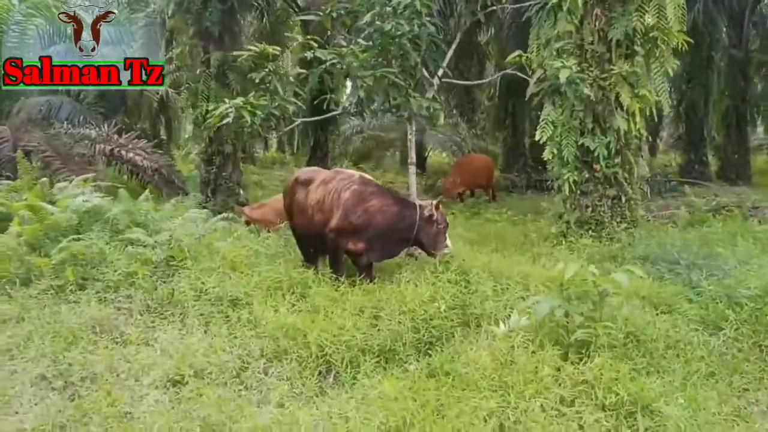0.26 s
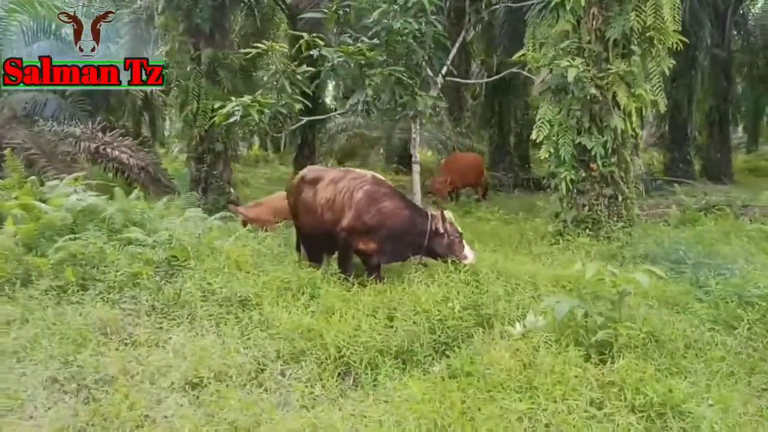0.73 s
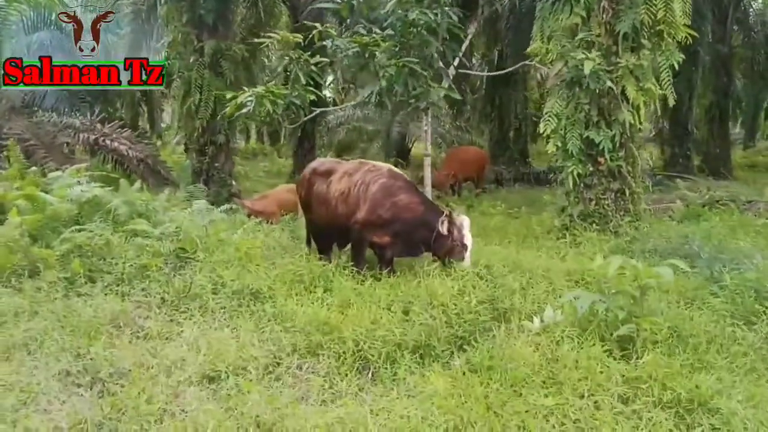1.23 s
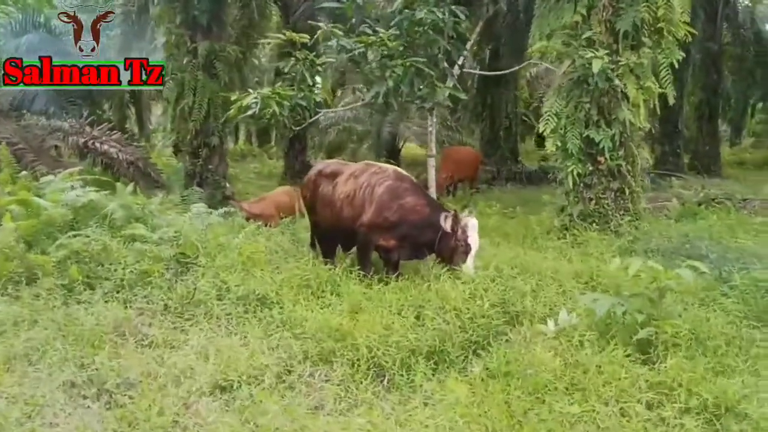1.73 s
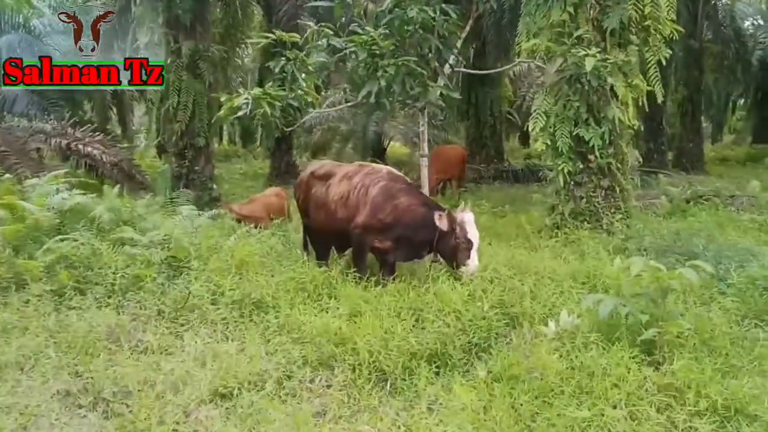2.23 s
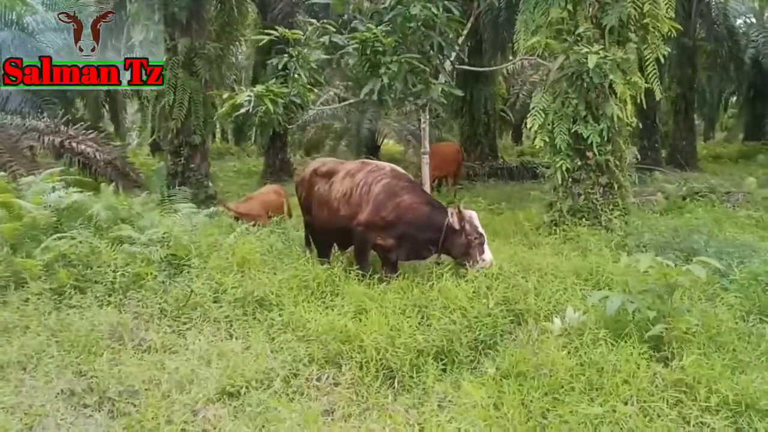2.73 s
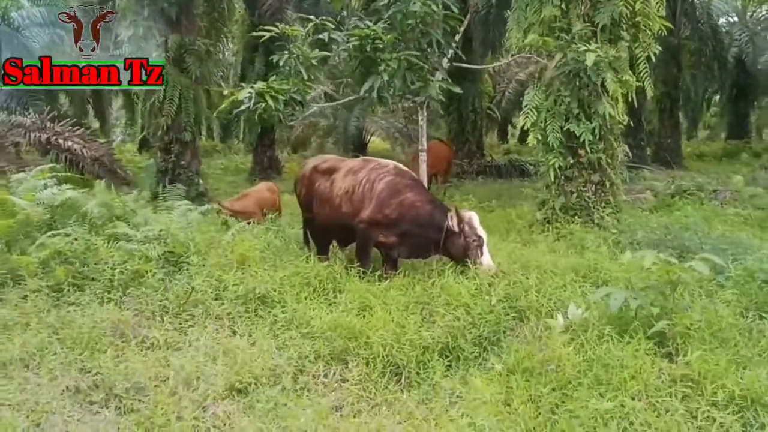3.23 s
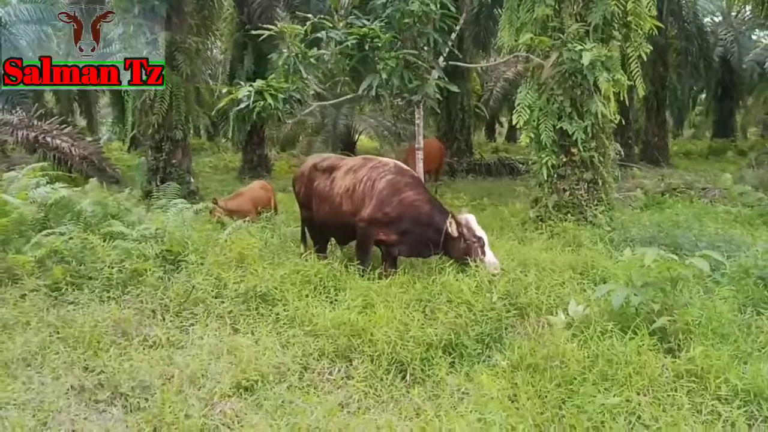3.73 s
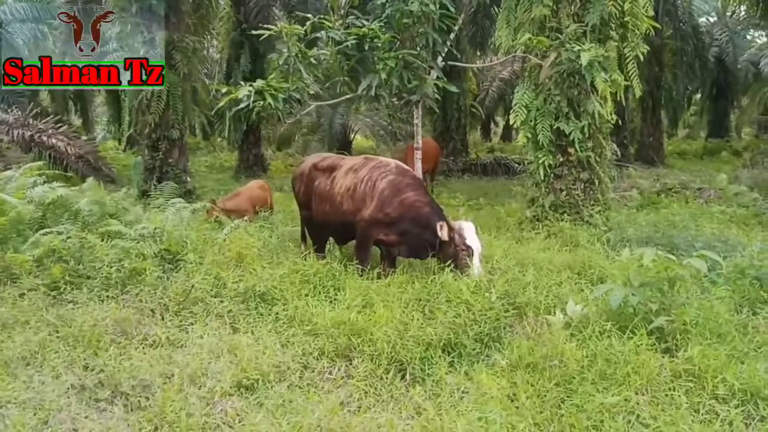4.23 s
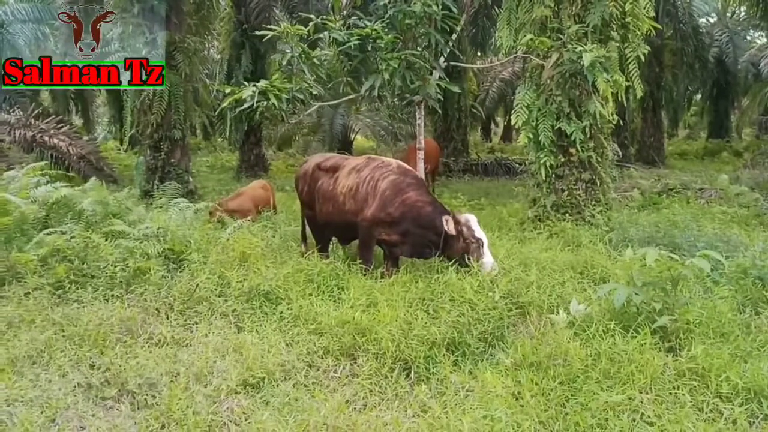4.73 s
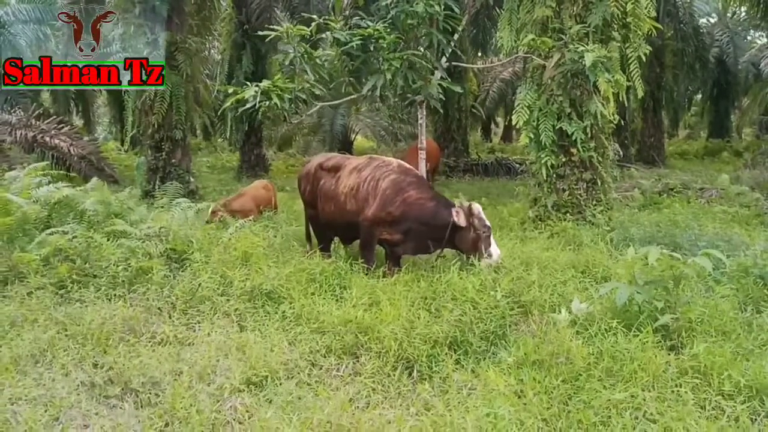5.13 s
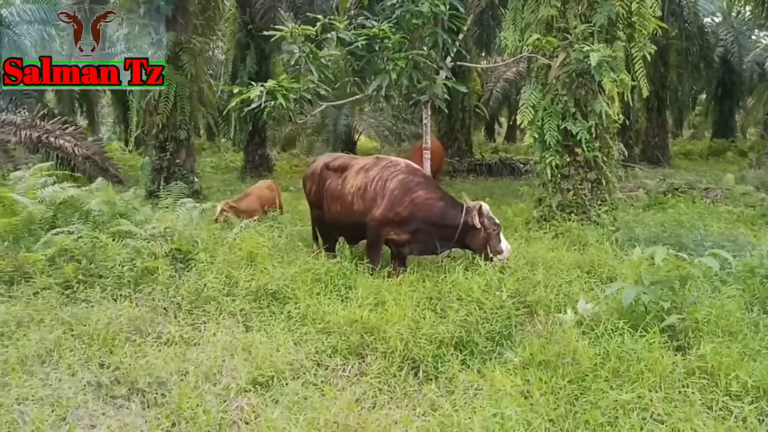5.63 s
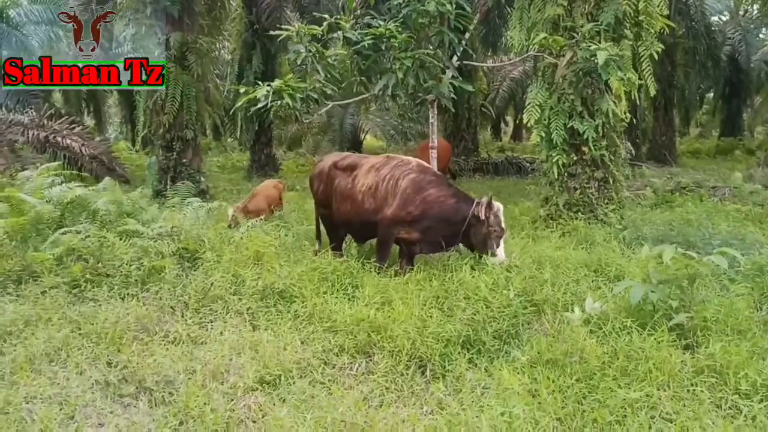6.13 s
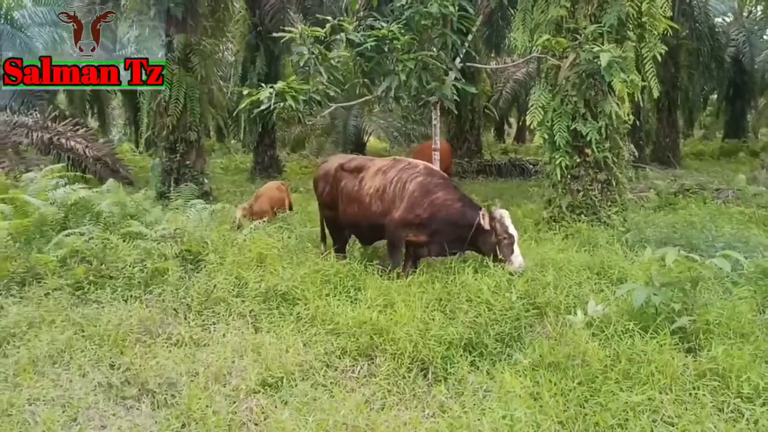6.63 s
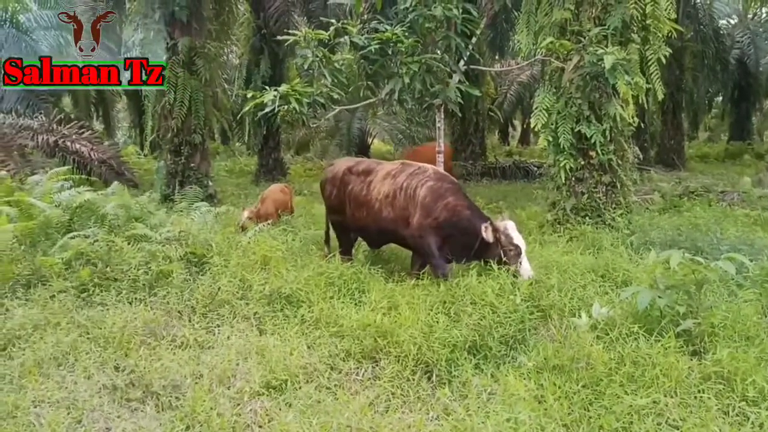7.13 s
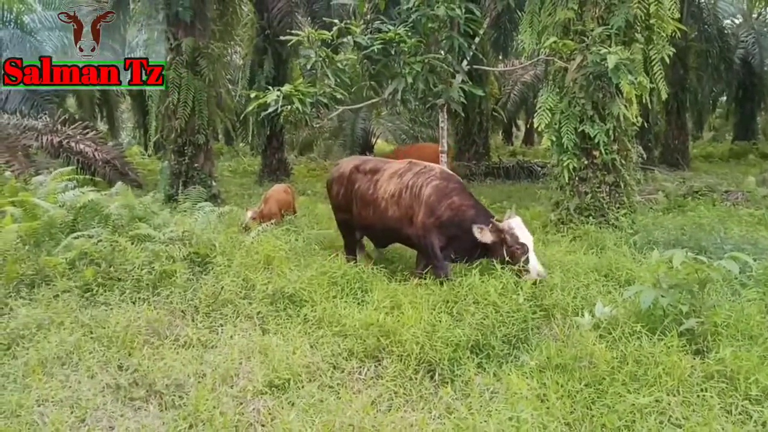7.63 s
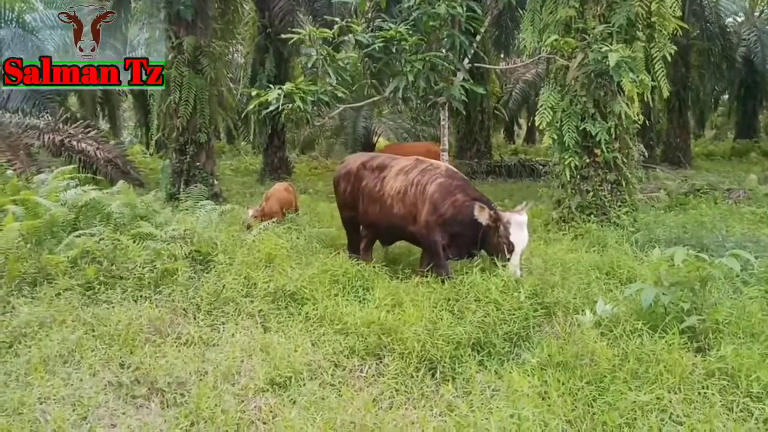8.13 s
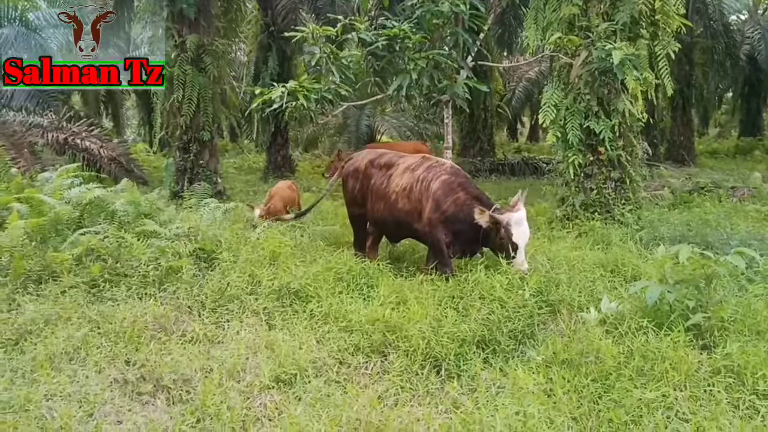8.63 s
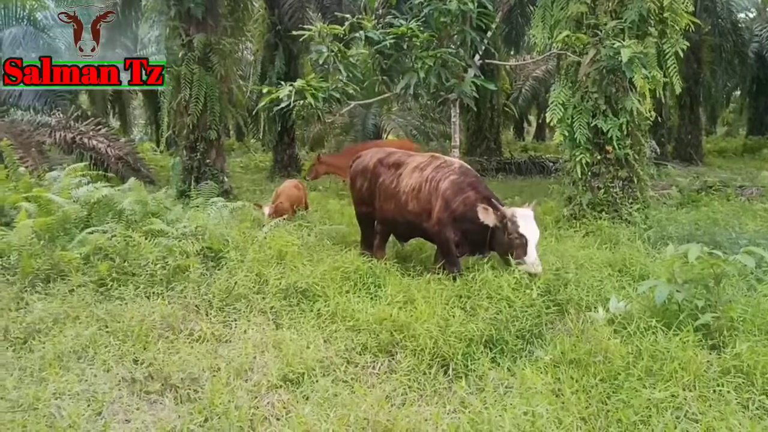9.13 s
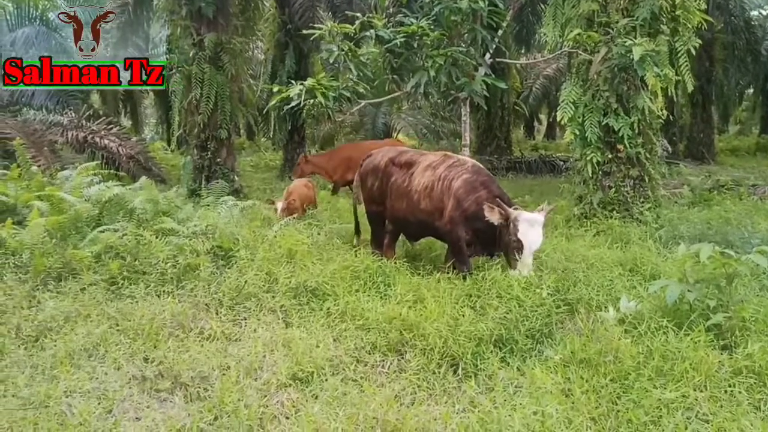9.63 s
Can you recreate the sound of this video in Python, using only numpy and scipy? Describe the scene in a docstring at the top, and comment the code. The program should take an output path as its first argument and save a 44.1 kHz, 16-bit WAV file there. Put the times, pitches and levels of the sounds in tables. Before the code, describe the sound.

Close, mono-like outdoor sound in a damp grove with a brief bright scatter from trunks. From 0 to 0.5 s grass rips strongly, with a crowd of dry stem snaps, wet pops and a tiny upward squeak. Tearing continues to about 2 s with scattered pops and snaps; a fuller pull runs 2.4-2.8 s, ending in a cluster of snaps near 3 s. From 3.5 to 6.7 s the grass is much quieter, with only small swishes. Lighter, airy brushing returns around 7 s and persists, with a sharp bright snap at 8 s. Throughout: soft low rumble, very high rasping katydid, thin whine and far insect chorus. Rapid cricket phrases start at 1.5, 2.9, 4.3, 5, 7.2 and 9 s; a high trill spans 3.2-4.9 s. Faint engine drones waver and glide. A faint hum passes near 7 s; short distant bird clucks fall at 7.3, 8.2 and 9.1 s.

```python
"""Damp palm grove, cattle grazing close to one microphone, over a low rumble and a far insect chorus.
From the start grass swishes and tears, stems snap and wet ground pops; a katydid rasps throughout.
Far engine drones glide in soon after; crickets chirp in pairs from 1.5 s, a high trill joins at 3.2 s.
Late on a faint far hum comes and goes, and a distant bird clucks three times from 7.3 s.
Noise is coloured for grass and air, resonated for stems and chorus; tones make chirps, clucks and drones."""
import sys
import numpy as np
from scipy import signal
from scipy.fft import rfft, irfft, next_fast_len
from scipy.io import wavfile

SR = 44100
rng = np.random.default_rng(int(sys.argv[2]) if len(sys.argv) > 2 else 0)


def elevation(decibels):
    """Turn decibel levels (scalar or array-like) into linear amplitude ratios."""
    levels = np.asarray(decibels, float)
    return 10 ** (levels / 20)


def bounce(signal):
    """Save signal as a 16-bit WAV file at the path given by the first command-line argument."""
    frames = np.transpose(np.atleast_2d(signal))
    limited = np.clip(frames, -1, 1)
    pcm = np.round(limited * 32767).astype(np.int16)
    wavfile.write(sys.argv[1], SR, pcm)


N = 435311

# Rumble, far leaves and microphone hiss, relative spectrum: f/Hz, level/dB per Hz
AIR_COLOUR = [(25, -39), (50, -4), (130, 0.5), (255, -9), (750, -20), (1100, -24.5), (2200, -30.5),
              (4000, -25), (4900, -21.5), (5500, -32), (6400, -33.5), (8200, -16), (10000, -27.5),
              (12300, -39), (15400, -25.5)]
# Hump in the rumble: f/Hz, width/Hz, mean level/dB
RUMBLE_TONES = [(90.4, 17, -66)]
# Close grass torn in full, relative spectrum: f/Hz, level/dB per Hz
TEARING_COLOUR = [(150, -44), (300, -4), (1000, -3.5), (1800, -2.5), (3100, 0), (4100, 6), (5600, 5.5),
                  (7200, 7.5), (9500, -21), (12000, -9.5), (14800, 3.5), (15400, -4.5)]
# Close grass lightly brushed, relative spectrum: f/Hz, level/dB per Hz
BRUSHING_COLOUR = [(150, -55), (300, -8.5), (650, -8), (1000, -34), (2000, -22), (4300, -2.5),
                   (5900, -10.5), (7900, 0), (10000, -6.5), (12100, -14.5), (14700, -3), (15400, -6)]
# Grass stirring all along: t/s, level/dB, share of light brushing/0-1
STIR = [(0.0, -47.5, 0), (0.5, -47.5, 0.26), (0.65, -47, 0.65), (1.25, -46.5, 0.4), (1.7, -48, 0.33),
        (2.05, -51.5, 0.57), (3.0, -50.5, 0.53), (3.3, -51.5, 0.25), (3.45, -57.5, 0.25),
        (3.76, -62.5, 0.67), (4.11, -53.5, 0.8), (4.6, -64.5, 0.4), (5.0, -56.5, 0.5), (5.3, -61, 0.73),
        (6.7, -56, 0.9), (7.3, -52, 0.7), (8.3, -53, 0.83), (8.8, -58, 0.63), (9.1, -53, 0.78),
        (9.87, -54, 0.7)]
# Single pulls and swishes through the grass: t/s, hold/s, top level/dB, share of light brushing/0-1
PULLS = [(0.0, 0.18, -40.5, 0.25), (0.93, 0.022, -44.5, 0.5), (1.08, 0.025, -45, 0.2),
         (1.372, 0.17, -46, 0.16), (2.133, 0.016, -47.5, 0.57), (2.369, 0.42, -39.5, 0.3),
         (3.083, .03, -61, 0.4), (5.02, .02, -49.5, 0.75), (5.855, .03, -54, 1), (6.133, 0.022, -50.5, 0.8),
         (6.858, 0.22, -49.5, 0.77), (7.088, 0.061, -40.5, 0.93), (7.655, 0.27, -46.5, 1),
         (7.908, 0.023, -43, 0.8), (8.067, 0.016, -45, 0.92), (8.417, .02, -51, 0.56),
         (8.868, 0.025, -49, 0.9), (9.259, 0.022, -49, 0.9), (9.612, 0.017, -44.5, 0.92)]
# Katydid, relative spectrum: f/Hz, level/dB per Hz
KATYDID_COLOUR = [(9000, -61), (11000, -15), (12400, -17), (13500, -10), (15050, -3), (15210, 5),
                  (15350, -5.5)]
# Far insect chorus: t/s, level/dB
CHORUS = [(0.0, -58.5), (2.0, -57), (3.25, -55.5), (4.2, -56.5), (5.5, -58), (7.0, -58), (8.3, -56),
          (9.87, -56)]
# Voices of the chorus: f/Hz, width of the first resonance/Hz, relative level/dB
CHORUS_VOICES = [(7020, 200, -17.5), (7154, 240, -5.5), (7240, 180, -7.5)]
# Farther cricket, blurred: t/s, mean level/dB
FAR_CRICKET = [(2.9, -76), (3.15, -70), (4.5, -63), (4.85, -70), (5.1, -68)]
# Dry stems snapping close by: t/s, ring level/dB, ring f/Hz, crack peak level/dB
SNAPS = [(0.055, -29, 6060, -40), (0.11, -28, 3800, -25), (0.1846, -37, 4400, -43),
         (0.2207, -24, 4400, -35), (0.2265, -33, 4300, -42), (0.2353, -21.5, 4770, -38),
         (0.3082, -36, 5200, -40), (0.3182, -34, 4200, -37), (0.3265, -36, 5000, -38),
         (0.3617, -36, 3720, -45), (0.4215, -39, 2600, -34), (0.4266, -34, 3900, -43),
         (0.4522, -38, 6000, -45), (0.4735, -42, 2900, -35), (0.4946, -32, 3700, -27.5),
         (0.5092, -36, 3500, -38), (0.6442, -34.5, 4000, -44), (1.5132, -36, 4300, -36),
         (1.555, -30, 5000, -40), (1.8802, -43, 3200, -45), (2.8122, -24.5, 6450, -37),
         (2.8811, -25.5, 6300, -35), (2.8992, -36, 5450, -50), (2.9362, -34, 5100, -40),
         (3.0392, -38, 5700, -37), (3.1012, -36, 5400, -45), (3.0822, -35, 4300, -42),
         (3.2957, -37, 5990, -41), (3.5182, -35, 5200, -39), (5.5324, -44, 6000, -37),
         (7.9641, -27, 4130, -42), (7.9639, -16.5, 8100, -27), (7.3, -30, 8100, -42),
         (8.3667, -38, 4400, -28), (9.7792, -47, 2940, -38.5)]
# Wet pops close by: t/s, ring level/dB, ring f/Hz, ring time/ms, crack peak level/dB
POPS = [(0.1792, -35, 2500, 2.5, -54), (0.206, -32.5, 2990, 4.8, -28.5), (0.455, -49, 1500, 14, -35.5),
        (0.7102, -38.5, 3180, 3.9, -33), (0.746, -37.5, 3870, 9.9, -34), (0.747, -48, 1890, 8.4, -51),
        (1.562, -49, 1010, 7, -58), (3.0928, -34, 3570, 2.1, -42), (1.758, -49.5, 900, 13, -53),
        (1.932, -50, 925, 5.5, -44), (5.466, -46, 300, 6.5, -49.5), (0.8419, -35, 310, 7, -35),
        (0.843, -42, 1040, 14, -51), (0.86, -43, 430, 8.3, -50), (0.993, -44, 815, 6, -41.5),
        (1.205, -31, 422, 2.8, -33), (1.219, -38, 806, 2.7, -44), (1.5142, -44, 2460, 11, -33),
        (4.485, -42, 200, 8, -52), (2.912, -49, 2100, 5.3, -57), (3.056, -56, 1000, 9.6, -58),
        (3.135, -52, 1510, 4.3, -46), (1.979, -47, 2260, 5.5, -45), (2.1106, -32, 267, 5, -36.5),
        (2.205, -46, 500, 3, -36.5), (2.306, -35.5, 467, 5.1, -48), (2.33, -34.5, 273, 4.4, -46),
        (2.7816, -40, 557, 5, -41), (2.7901, -38.5, 534, 7.3, -41), (2.794, -38, 3560, 3, -50),
        (2.811, -44, 970, 8.6, -38), (2.881, -42, 3120, 3.3, -33), (2.936, -41, 2090, 5.9, -44),
        (3.0067, -37, 1590, 5.1, -58), (3.082, -40, 1880, 2.6, -44), (7.3587, -41, 302, 6.5, -51)]
# Wet squeaks that slide up: t/s, peak level/dB, first f/Hz, last f/Hz, length/ms
SQUEAKS = [(0.2165, -37, 1220, 3200, 8.9), (1.5096, -32, 1100, 2400, 5.4), (0.499, -44, 1250, 1900, 12)]
# Far engine drones: level before wavering/dB, glide [(t/s, f/Hz), ..]
DRONES = [(-58, [(0.35, 144.5), (1.0, 156.9), (2.0, 168)]), (-59.5, [(3.4, 169), (4.5, 185)]),
          (-61.5, [(4.2, 155.5), (5.4, 164.5), (7.0, 186.1)]), (-60, [(6.7, 152.2), (8.0, 155.8),
          (8.5, 165.4), (9.87, 167.4)]), (-59.5, [(3.6, 126.7), (5.6, 133.3), (6.05, 127.8), (7.0, 93.1)])]
# Cricket phrases: t/s, number of chirps, chirp to chirp/ms, typical peak level/dB
CRICKET_PHRASES = [(1.5145, 12, 40.3, -57), (2.915, 34, 39.77, -54), (4.274, 5, 41.0, -52),
                   (5.0488, 38, 39.7, -53.5), (7.237, 29, 39.7, -53), (9.058, 19, 40.95, -54)]
# High trilling insect: t/s, typical peak level/dB
TRILL = [(3.2, -69), (3.35, -58), (4.0, -58), (4.2, -73), (4.8, -64), (4.95, -75)]
# Faint far hum: t/s, level/dB
HUM = [(6.3, -116), (6.45, -72), (7.1, -65.5), (7.6, -74), (7.9, -91)]
# Distant bird clucks: t/s, length/s, top f/Hz, top level ahead of the throat/dB
CLUCKS = [(7.303, 0.029, 386, -47.5), (8.18, 0.032, 422, -46), (9.069, 0.0342, 453, -44.5)]
# Weight of the bird's throat on each harmonic: f/Hz, gain/dB
CLUCK_THROAT = [(300, -16), (430, -6.5), (780, 1.5), (1000, -13.5), (1280, -3.5), (1650, -37), (2150, -12),
                (2450, -13), (2900, -27), (3600, -44)]


def unit_rms(x):
    """Scale to unit rms."""
    return x / np.sqrt(np.mean(x ** 2) + 1e-20)


def in_time(rows):
    """Columns of a table, one value per sample."""
    s, *columns = np.transpose(rows)
    return [np.interp(np.arange(N) / SR, s, c) for c in columns]


def at_hz(points, hz):
    """A spectrum read on a log-frequency axis."""
    table_hz, db = np.transpose(points)
    return np.interp(np.log(hz), np.log(table_hz), db)


def drift(rate_hz):
    """Random wander of spread 1: noise through two equal low-pass poles, made at a fortieth of SR."""
    r = np.exp(-80 * np.pi * rate_hz / SR)
    noise = rng.standard_normal(N // 40 + 2002)
    slow = signal.lfilter([1], [1, -2 * r, r * r], noise)[2000:]   # skip the filter's settling
    return np.interp(np.arange(N) / 40, np.arange(len(slow)), unit_rms(slow - slow.mean()))


def resonance(x, hz, width_hz):
    """Two-pole resonance, gain 1 on top."""
    r = np.exp(-np.pi * width_hz / SR)
    poles = [1, -2 * r * np.cos(2 * np.pi * hz / SR), r * r]
    return signal.lfilter([(1 - r * r) / 2, 0, (r * r - 1) / 2], poles, x)


def ringing_noise(hz, *widths_hz):
    """White noise blurred into a tone by resonances in a row; rms 1."""
    x = rng.standard_normal(N)
    for width_hz in widths_hz:
        x = resonance(x, hz, width_hz)
    return unit_rms(x)


def coloured(x, spectrum):
    """Shape a steady excitation by a spectrum; rms 1."""
    size = next_fast_len(N)
    hz = np.maximum(np.arange(size // 2 + 1) * SR / size, 1)
    return unit_rms(irfft(rfft(x, size) * elevation(at_hz(spectrum, hz)), size)[:N])


def grove(x, wet_db, t60_s):
    """Trunks and fronds scatter a sound back as a short bright haze."""
    t = np.arange(SR // 4) / SR
    haze = np.diff(rng.standard_normal(len(t) + 1)) * elevation(-60 * t / t60_s) * (t > .006)
    haze = signal.lfilter([1], [1, -.6], haze)
    haze /= np.sqrt(np.sum(haze ** 2))
    return x + elevation(wet_db) * signal.fftconvolve(x, haze)[:N]


def air():
    """Steady coloured noise, its rumble lumped around a low tone of wandering level."""
    out = elevation(-53.5) * coloured(rng.standard_normal(N), AIR_COLOUR)
    for hz, width_hz, level_db in RUMBLE_TONES:
        out += elevation(level_db + 2.4 * drift(0.83)) * ringing_noise(hz, width_hz)
    return out


def grass_motion():
    """Level and brushing share of the grass: steady stirring plus pulls that rise, hold and fall."""
    rise_db_per_s, fall_db_per_s = 132, 121
    arch_db_per_s = 7.5   # a held pull is strongest at its middle
    t = np.arange(N) / SR
    stir_db, share = in_time(STIR)
    power = elevation(2 * stir_db)
    brushed = power * share
    for s, hold_s, db, share in PULLS:
        loss_db = rise_db_per_s * np.maximum(s - t, 0)
        loss_db += fall_db_per_s * np.maximum(t - s - hold_s, 0)
        loss_db += arch_db_per_s * abs(np.clip(t - s, 0, hold_s) - hold_s / 2)
        pull = elevation(2 * (db - np.minimum(loss_db, 80)))
        power, brushed = power + pull, brushed + pull * share
    return 10 * np.log10(power), np.clip(brushed / power, 0, 1)


def rustle(grain_db=2.5, clump_db=1.4, patchy_db=1.25):
    """Dense clumped blade clicks, full tearing blended with thinner brushing; half octaves flicker apart."""
    level_db, brushing = grass_motion()
    blend, out, size = np.zeros(N), np.zeros(N), next_fast_len(N)
    for colour, share in ((TEARING_COLOUR, 1 - brushing), (BRUSHING_COLOUR, brushing)):
        grains = elevation(grain_db * np.minimum(rng.exponential(1, N), 6)) * rng.standard_normal(N)
        clumped = grains * elevation(clump_db * drift(79))
        blend += np.sqrt(share) * coloured(clumped, colour)
    hz = np.arange(size // 2 + 1) * SR / size
    half_octaves = 2 * np.log2(np.clip(hz, 300, 19200) / 300)
    spectrum = rfft(blend, size)
    for step in range(13):
        band = irfft(spectrum * np.clip(1 - abs(half_octaves - step), 0, 1), size)[:N]
        out += elevation(patchy_db * drift(10.2)) * band
    return elevation(level_db) * out


def crackle(per_s=400, over_db=1.0, cycles=9):
    """Small stems give way at random and ring while grass is torn; light brushing makes this fainter."""
    level_db, brushing = grass_motion()
    struck = rng.random(N) < per_s / SR
    ticks = struck * elevation(3.5 * np.minimum(rng.standard_normal(N), 1.5)) + 1e-18
    dealt = rng.integers(0, 12, N)   # each tick goes to one of twelve pitches
    rings = np.zeros(N)
    for k, hz in enumerate(np.geomspace(1100, 7500, 12)):
        rings += cycles * resonance(ticks * (dealt == k), hz, hz / cycles) * SR / hz / 20
    return elevation(level_db + over_db - 14.3 * brushing) * rings


def katydid(rasps_per_s=22.6, tooth_gap=0.33, width=0.1, leak=1.5):
    """Very high rasp: three scrapes a cycle on a steady hiss, swelling irregularly."""
    cycle = np.cumsum(rasps_per_s * (1 + 0.014 * drift(2.0))) / SR % 1
    gate = leak + sum(np.exp(-((cycle - .15 - k * tooth_gap) / width) ** 2) for k in range(3))
    swell = elevation(1.2 * drift(5.7))
    return elevation(-52) * unit_rms(gate * swell * coloured(rng.standard_normal(N), KATYDID_COLOUR))


def chorus():
    """Far insect chorus: noise that throbs, blurred into a few close pitches."""
    many = rng.standard_normal(N) * elevation(0.84 * drift(45))   # many singers throb unevenly together
    voices = np.zeros(N)
    for hz, width_hz, db in CHORUS_VOICES:
        voices += elevation(db) * resonance(resonance(many, hz, width_hz), hz, 2 * width_hz)
    return elevation(in_time(CHORUS)[0]) * unit_rms(voices)


def whine():
    """A thin steady insect whine: noise through one narrow resonance."""
    return elevation(-71) * ringing_noise(8585, 20)


def far_cricket():
    """A farther cricket, blurred into a fluttering tone that comes and goes."""
    level_db = in_time(FAR_CRICKET)[0] + 2.0 * drift(30)
    return elevation(level_db) * ringing_noise(4760, 250, 300)


def breaks(rows, crack_ms, rise=0.04, ragged=2.1, plain=0.9):
    """A short ring slides up in pitch while fibres part around it in a ragged run of ticks."""
    out, t = np.zeros(N + 2000), np.arange(2000) / SR
    for s, ring_db, hz, ms, crack_db in rows:
        top_hz = 1160 + 1.76 * hz   # how high the crack reaches
        age = t / (ms / 1000)
        swell = 3.01 * age * np.exp(1 - 3.4 * age)
        ring = swell * np.sin(2 * np.pi * hz * t * (1 - rise / 2 + rise * age / 2))
        noise = rng.standard_normal(2000)
        ticks = noise * abs(noise) ** ragged   # a few stand out
        burst = ticks * np.exp(-t / (crack_ms / 1000)) * np.minimum(4000 * t / crack_ms, 1)
        band = signal.butter(2, [hz / 2, min(top_hz, .4 * SR)], "band", fs=SR, output="sos")
        crack = signal.sosfilt(band, burst)
        patches_hz = hz / 2 * (2 * top_hz / hz) ** rng.random(3)   # the fibres favour a few pitches
        crack = plain * crack + sum(resonance(crack, p_hz, p_hz / 9) for p_hz in patches_hz)
        at = round(s * SR)
        out[at:at + 2000] += elevation(ring_db) * ring + elevation(crack_db) * crack / abs(crack).max()
    return out[:N]


def snaps(ring_cycles=3.6):
    """Dry stems snap close by: ring times scale with the period, cracks are short."""
    rows = [(s, db, hz, 1000 * ring_cycles / hz, crack_db) for s, db, hz, crack_db in SNAPS]
    return breaks(rows, crack_ms=2.3)


def pops():
    """Wet ground pops close by: each rings like a closing cavity, rising in pitch."""
    return breaks(POPS, crack_ms=5.9)


def squeaks():
    """A wet gap closes fast: a few cycles sweeping upward."""
    out = np.zeros(N)
    for s, db, first_hz, last_hz, ms in SQUEAKS:
        length = ms / 1000 * SR
        age = np.arange(round(length)) / length
        phase = 2 * np.pi * np.cumsum(first_hz + (last_hz - first_hz) * age) / SR
        at = round(s * SR)
        out[at:at + len(age)] += elevation(db) * np.sin(np.pi * age ** 0.73) * np.sin(phase)
    return out


def drones(fade_s=0.18):
    """Far engines: each drone is a wavering, gliding low tone that fades in and out."""
    out, t = np.zeros(N), np.arange(N) / SR
    for db, glide in DRONES:
        s, hz = np.transpose(glide)
        fade = np.clip(np.minimum(t - s[0], s[-1] - t) / fade_s, 0, 1)
        phase = 2 * np.pi * np.cumsum(np.interp(t, s, hz) * (1 + .008 * drift(4))) / SR
        out += fade * elevation(db + 4.15 * drift(2.2)) * np.sin(phase)
    return out


def strokes(times, db, hz, ms, sag_hz_per_ms=0):
    """Wing strokes: short bell-shaped tones, each a little off in pitch and level, able to sag in pitch."""
    out, t = np.zeros(N), np.arange(-300, 300) / SR
    for s, level_db, (a, b, c) in zip(times, db, rng.standard_normal((len(times), 3))):
        at = round(s * SR)
        tone = np.cos(2 * np.pi * (hz * (1 + .009 * a) - 500 * sag_hz_per_ms * t) * t + 3 * c)
        bell = np.exp(-(t / (ms / 1000)) ** 2)
        out[at - 300:at + 300] += elevation(level_db + 1.5 * b) * bell * tone
    return out


def crickets(stroke_gap_s=.0125):
    """Crickets in two-stroke chirps, each stroke sagging in pitch as the wing slows."""
    out = np.zeros(N)
    for s, chirps, gap_ms, level_db in CRICKET_PHRASES:
        first = s + gap_ms / 1000 * np.arange(chirps)
        times = np.concatenate([first, first + stroke_gap_s])
        out += strokes(times, np.full(len(times), level_db), hz=4950, ms=3.8, sag_hz_per_ms=40)
    return out


def trill(period_s=.01379):
    """A high insect trills in evenly spaced wing strokes."""
    times = 3.3015 + period_s * np.arange(-7, 118)
    return strokes(times, np.interp(times, *np.transpose(TRILL)), hz=9220, ms=2.4)


def hum():
    """A faint far hum: noise through a narrow resonance, coming and going."""
    return elevation(in_time(HUM)[0]) * ringing_noise(744, 40)


def bird(rough=0.2):
    """Short arched clucks: harmonics weighted by the throat, slightly hoarse, echoed once off near trunks."""
    rest_hz, top_at, sharp = 343.7, 0.56, 1.42   # pitch at both ends, place of the top 0-1, narrowness
    arch_db = 7.5   # fall of level towards the ends
    out = np.zeros(N)
    for s, length_s, top_hz, top_db in CLUCKS:
        at = np.arange(round(s * SR), round((s + length_s) * SR))
        arch = np.interp((at / SR - s) / length_s, [0, top_at, 1], [0, 1, 0])
        hz = rest_hz + (top_hz - rest_hz) * arch ** sharp
        phase = 2 * np.pi * np.cumsum(hz) / SR
        voice = sum(elevation(at_hz(CLUCK_THROAT, k * hz)) * np.sin(k * phase) for k in range(1, 10))
        level = elevation(top_db - arch_db * (1 - arch) ** 2) * np.minimum(8 * arch, 1)
        out[at] = np.sqrt(2) * level * voice
    out = out * (1 + rough * drift(280))
    echo = 1.9398 * np.gradient(out)   # the slope of the wave: thinner
    return out + np.roll(echo, round(0.021 * SR))


def scene():
    """One microphone feeds both channels: grass and stems close, insects and bird farther off."""
    near = grove(crackle() + snaps() + pops() + squeaks(), wet_db=-9.5, t60_s=0.1)
    insects = grove(chorus() + whine() + crickets() + trill(), wet_db=-12, t60_s=0.16)
    distant_bird = grove(bird(), wet_db=-5, t60_s=.22)
    tones = far_cricket() + hum()
    mix = air() + rustle() + katydid() + drones() + near + insects + distant_bird + tones
    return np.tile(mix, (2, 1))


def roll_off(x):
    """The treble ends steeply here."""
    return signal.sosfilt(signal.butter(12, 16840, fs=SR, output="sos"), x)


def record(dry):
    """The top is cut steeply: a 60 Hz wide slope down to nothing at 15520 Hz."""
    hz = np.arange(N // 2 + 1) * SR / N
    mix = irfft(rfft(dry) * np.clip((15520 - hz) / 60, 0, 1), N)
    return roll_off(mix)


dry = scene()
out = record(dry)
bounce(out)
```